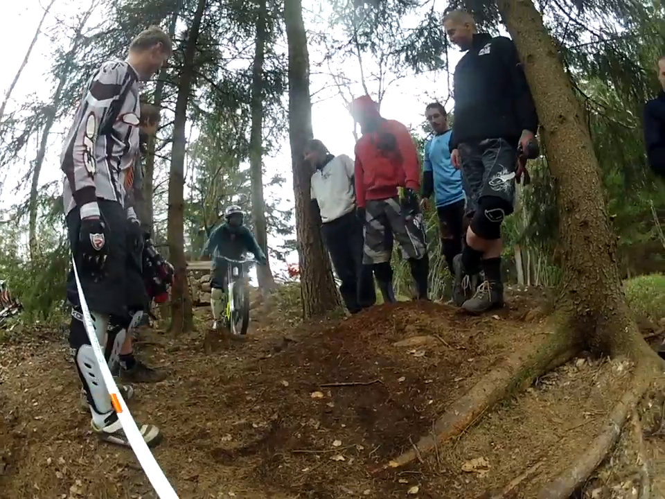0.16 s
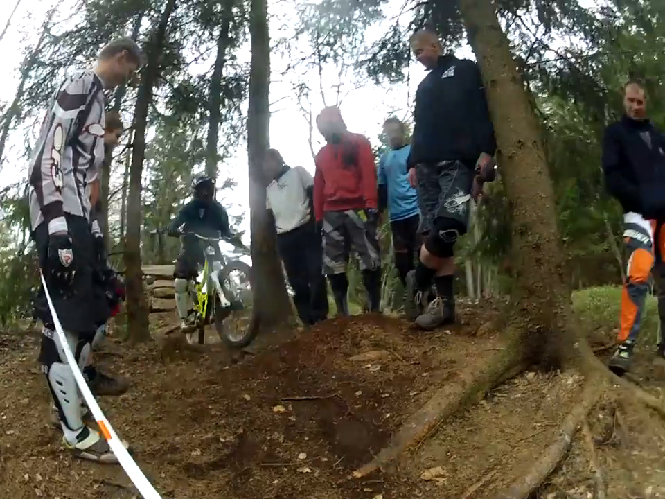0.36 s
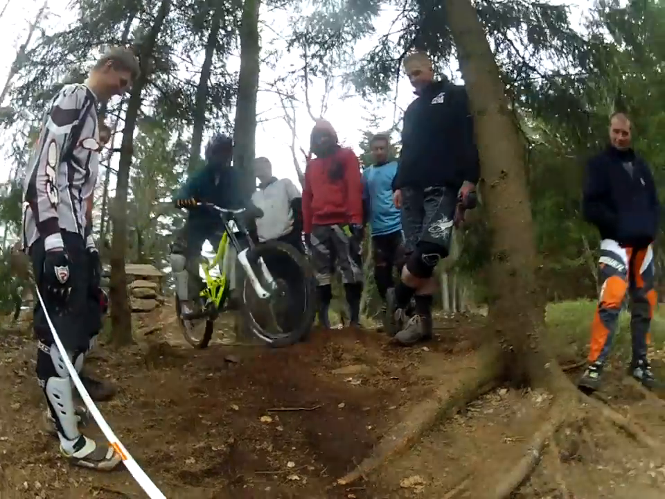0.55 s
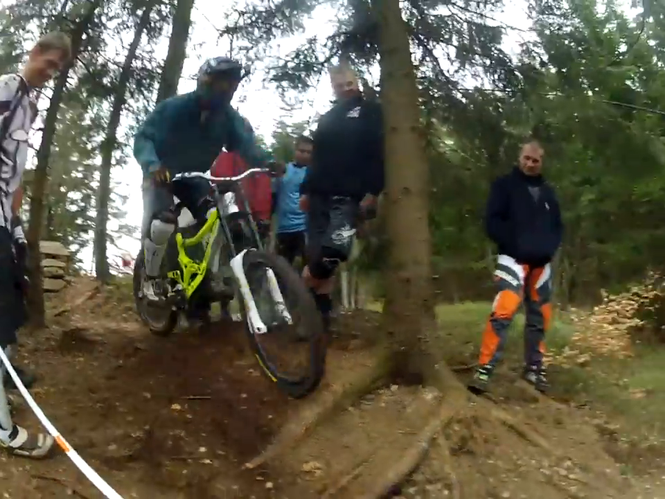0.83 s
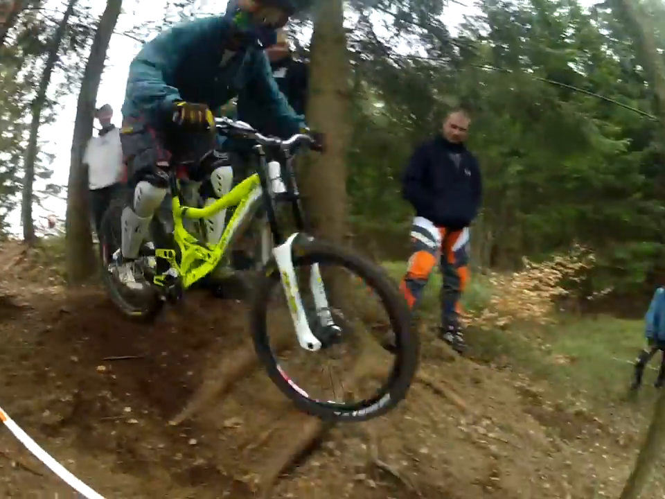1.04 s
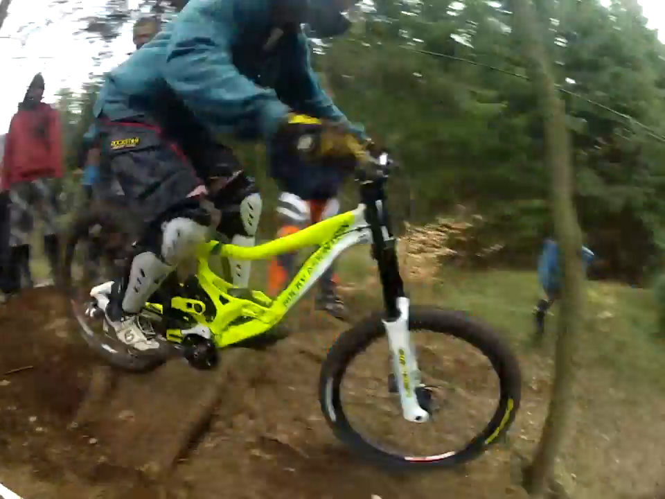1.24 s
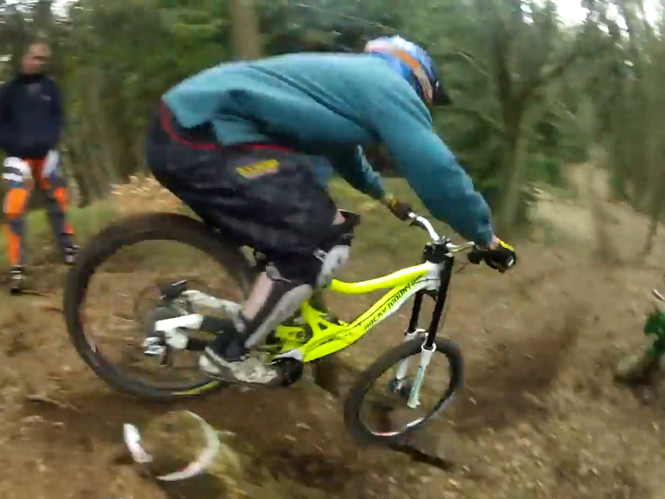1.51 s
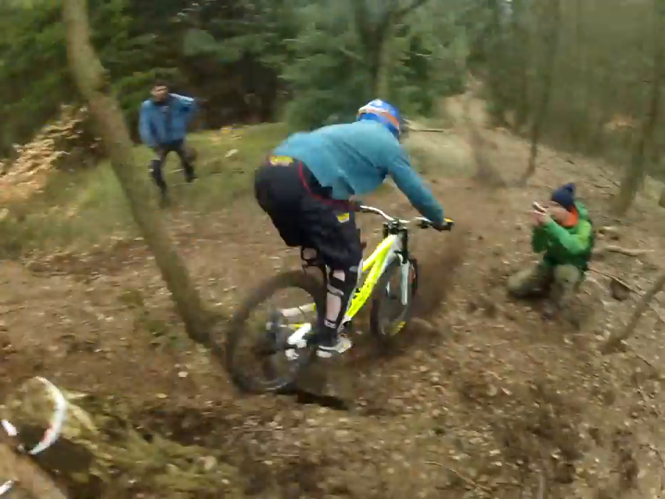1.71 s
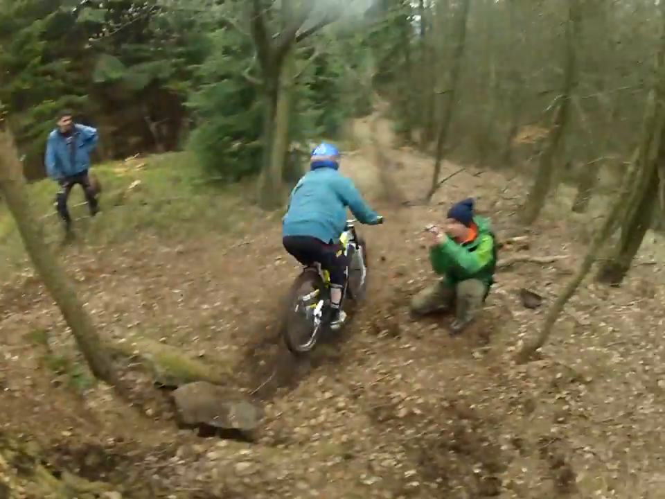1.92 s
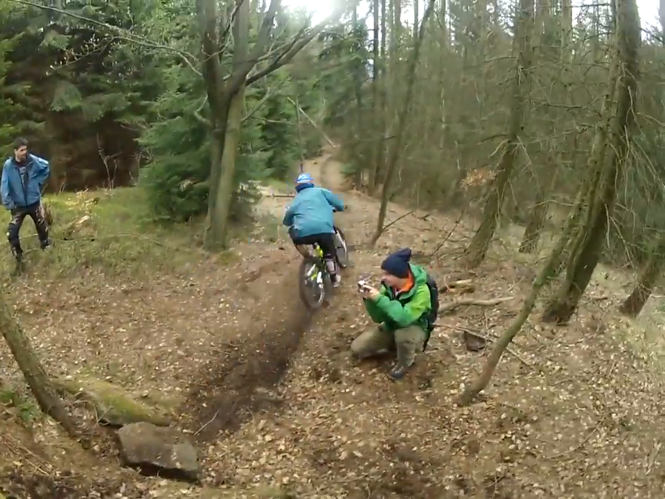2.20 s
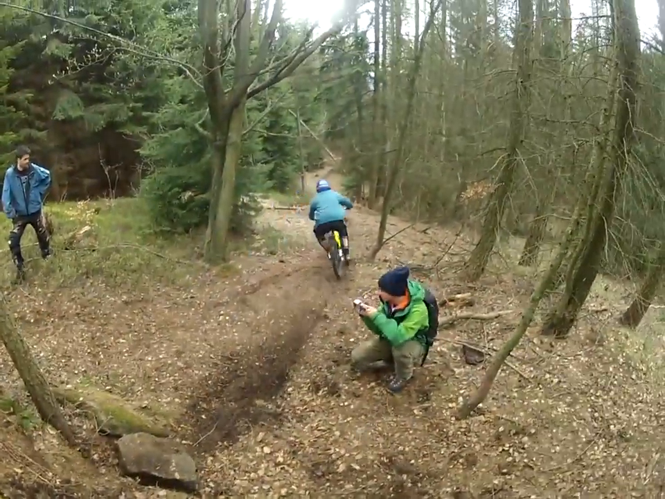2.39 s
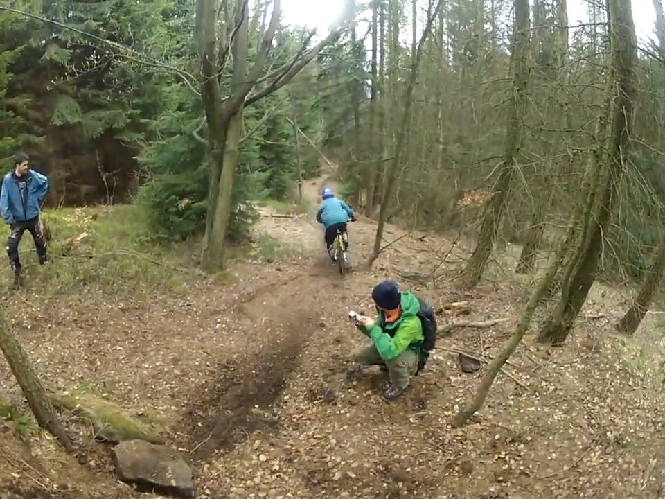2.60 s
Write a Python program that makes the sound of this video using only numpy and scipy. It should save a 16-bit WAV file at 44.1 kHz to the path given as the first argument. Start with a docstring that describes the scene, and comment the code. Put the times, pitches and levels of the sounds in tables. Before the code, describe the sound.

A mountain bike rattles and thumps over roots, then skids through loose dirt in a quiet forest

```python
"""Mountain bike on a forest trail

A mountain bike rolls over roots and skids through loose dirt in a quietly rustling forest.
Random grains and blows excite resonances of the frame and chain; decaying modes make the wheel thumps.
A deep tone of wavering pitch sways under it all, with low resonant noise around it.
A small camera mounted on the bike holds each sample of a slow converter, mirroring the sound into the treble."""
import sys
import numpy as np
from scipy.fft import rfft, irfft, next_fast_len
from scipy.io import wavfile
from scipy.ndimage import uniform_filter1d, map_coordinates

SR = 44100
rng = np.random.default_rng(int(sys.argv[2]) if len(sys.argv) > 2 else 0)


def digitize_waveform(pressure):
    """Quantize a signal to 16-bit integers and store it at the path in sys.argv[1].

    Rows of a 2-D input are taken as channels; values are limited to [-1, 1].
    """
    field = np.atleast_2d(pressure).T
    bounded = np.clip(field, -1, 1)
    quanta = np.round(bounded * 32767).astype(np.int16)
    wavfile.write(sys.argv[1], SR, quanta)


N = 121275
T = np.arange(N) / SR

# Forest and low hum
FOREST_DB = -64
RUMBLE_DB, RUMBLE_HZ, RUMBLE_WIDTH_HZ = -11.5, 37.3, 30  # level relative to the smoothed hum level
BOOM_HZ, BOOM_WIDTH_HZ = 70, 15.6  # each of two cascaded resonances
# Wheel thumps
GLIDE, GLIDE_S = 0.43, 0.011  # the boom starts this share high and settles with this time constant
BOOM_RISE_S, KNOCK_RISE_S = 0.0039, 0.0012
SCUFF_DB, SCUFF_RISE_S, SCUFF_T60 = -6.5, 0.0027, 0.079  # soil noise relative to the knock; t60 in s
# Chain ticks
TICK_T60, TICK_DB, SNAP_DB = 0.03, -3.5, 19.5  # s; offset of every tick; sharp contact over its burst
# Loose dirt
GRAINS_PER_S, HISS_SHARE, GRAIN_SPREAD_DB = 3000, 0.44, 2.5
FOCUS_DB, BED_FOCUS_DB = 7.5, 2  # loss per octave away from the centre: rattles, steady grit
RATTLE_RISE_S, RATTLE_DB = 0.0012, -8  # RATTLE_DB offsets every rattle
STRIKE_DB, STRIKE_FOCUS = 15.5, 2.2  # opening blow over its burst; factor on its loss per octave
# Converter
CONVERTER_HZ = 12000
GUARD_HZ, GUARD_ORDER = 5720, 22  # low-pass ahead of the hold
HISS_DB, HISS_HZ = -74.5, 10500  # level of the white noise before its high-pass, and the cutoff
ROLL_OFF_HZ, TOP_HZ = 15400, 15850


def amp(db):
    """Logarithmic level: dB to a gain in amplitude."""
    return 10 ** (np.asarray(db) / 20)


def unit(x):
    """Normalization to a root-mean-square value of 1."""
    return x / np.sqrt(np.mean(x ** 2) + 1e-20)


def along(points, hz):
    """Spectral envelope: (Hz, value) points joined on a logarithmic frequency axis."""
    f, v = np.transpose(points)
    return np.interp(np.log(hz + 1), np.log(f + 1), v)


def curves(rows):
    """Piecewise-linear modulation: one value per sample for each column after the time."""
    s, *cols = np.transpose(rows)
    return [np.interp(T, s, c) for c in cols]


def wobble(rate):
    """Slow random fluctuation: a smooth curve through random knots, rate of them a second."""
    return map_coordinates(rng.standard_normal(int(N * rate / SR) + 4), [T * rate])


def filtered(x, response):
    """Linear filtering: the spectrum of x times a complex frequency response."""
    m = next_fast_len(N + SR // 2)
    return irfft(rfft(x, m) * response(np.fft.rfftfreq(m, 1 / SR)), m)[..., :N]


def peak(f, hz, width_hz):
    """Damped resonance: a causal second-order band-pass with unit gain at its centre."""
    return 1j * f * width_hz / (hz * hz - f * f + 1j * f * width_hz)


def burst(s, rise, t60, hold=0):
    """Exponential envelope: swells up to time s, holds, then falls 60 dB in t60 seconds."""
    swell = np.exp(np.minimum(T - s, 0) / abs(rise))
    decay = amp(-60 * np.maximum(T - s - abs(hold), 0) / abs(t60))
    return np.where(T < s, swell, decay)


def ring(s, modes, rise, glide=0):
    """Modal decay: modes struck at time s at slightly random levels, sliding down into pitch."""
    t = np.maximum(T - s, 0)
    bent = t + glide * GLIDE_S * (1 - np.exp(-t / GLIDE_S))
    out = 0
    for hz, db, t60 in modes:
        decay = amp(db + rng.normal(0, 1.2) - 60 * t / t60)
        out = out + decay * np.sin(2 * np.pi * hz * bent)
    return (1 - np.exp(-t / rise)) * out


def gravel(share):
    """Shot noise: sparse random grains of scattered size on a share of plain hiss."""
    hits = rng.random(N) < GRAINS_PER_S / SR
    grains = hits * rng.standard_normal(N) * amp(GRAIN_SPREAD_DB * rng.standard_normal(N))
    return unit(unit(grains) + share * rng.standard_normal(N))


def forest():
    """Coloured noise: the trees' quiet rustle is spectrally shaped noise of slowly wavering level."""
    # Each row: frequency in Hz, relative spectral level in dB per Hz.
    rustle_colour = [(350, -21), (600, -4), (648, -7), (1180, -16.5), (1470, -11.5), (2160, -14.5),
                     (2750, -14), (5900, -20), (7670, -43), (13000, -120)]
    rustle = unit(filtered(rng.standard_normal(N), lambda f: amp(along(rustle_colour, f))))
    return amp(FOREST_DB + 1.7 * wobble(7.44)) * rustle


def hum():
    """Frequency modulation and resonance: a wavering tone in loose rumble, with noise an octave above."""
    # Path of the deep tone. Each row: time in seconds, mean pitch in Hz, mean rms level in dB.
    tone_path = [(0.0, 34.7, -52), (0.05, 35.6, -46), (0.21, 33.6, -43.5), (0.25, 33.96, -32.5),
                 (0.57, 34.67, -30.5), (0.65, 33.8, -44), (0.67, 34.8, -31), (0.72, 35.8, -44),
                 (0.77, 36.3, -48), (0.82, 36.2, -34.5), (0.9, 35.57, -36), (0.92, 35.67, -19.5),
                 (0.94, 35.5, -20.5), (1.0, 34.9, -26.5), (1.18, 35.04, -37), (1.25, 34.7, -29),
                 (1.29, 36.8, -34), (1.31, 38.2, -49), (1.33, 37.7, -35.5), (1.35, 37, -31.5),
                 (1.42, 37.1, -36), (1.44, 38.4, -57), (1.46, 38.3, -37), (1.55, 37.9, -38.5),
                 (1.59, 37.1, -33), (1.71, 31.1, -39), (1.75, 29.2, -45.5), (1.81, 29.7, -29.5),
                 (1.83, 31.33, -32.5), (1.89, 29.57, -45), (1.96, 31.42, -32), (2.1, 31.8, -38.5),
                 (2.17, 31.9, -34), (2.23, 33.45, -44.5), (2.35, 32.93, -38), (2.48, 33.3, -37),
                 (2.53, 32.4, -51.5), (2.57, 32.3, -39.5), (2.62, 29.9, -50), (2.66, 29, -44),
                 (2.7, 28.2, -48.5), (2.75, 27.1, -45)]
    # Resonant noise an octave above. Each row: time in seconds, level in dB.
    boom_path = [(0.0, -64), (0.16, -50.5), (0.5, -45.5), (0.6, -56), (0.72, -45), (0.84, -45),
                 (0.93, -42.5), (1.58, -57), (1.88, -59), (1.98, -51), (2.37, -62), (2.75, -62)]
    hz, db = curves(tone_path)
    level = np.sqrt(2) * amp(db + 0.64 * wobble(14.33))
    phase = 2 * np.pi * np.cumsum(hz + 1.32 * wobble(16)) / SR
    tone = level * np.sin(phase)
    boom = unit(filtered(rng.standard_normal(N), lambda f: peak(f, BOOM_HZ, BOOM_WIDTH_HZ) ** 2))
    rumble = unit(filtered(rng.standard_normal(N), lambda f: peak(f, RUMBLE_HZ, RUMBLE_WIDTH_HZ) ** 2))
    rumble_level = amp(uniform_filter1d(db, size=SR // 30) + RUMBLE_DB)
    return tone + rumble_level * rumble + amp(curves(boom_path)[0]) * boom


def tyres():
    """Impact excitation: roots strike decaying wheel modes and scuff soil over dull rolling noise."""
    # Tyres rolling on soil. Each row: time in seconds, mean level in dB.
    roll_path = [(0, -56), (.2, -54), (.4, -52.5), (.6, -56), (.9, -56.5), (1.05, -53.5), (1.3, -55),
                 (1.45, -53.5), (1.65, -54.5), (1.85, -52.5), (2.0, -49.5), (2.1, -55), (2.3, -55.5),
                 (2.75, -57.5)]
    # Colour of the soil noise. Each row: frequency in Hz, relative spectral level in dB per Hz.
    soil_colour = [(53, -3), (90, -12), (150, -4.5), (190, -7), (320, -8.5), (420, -11.5), (600, -22),
                   (900, -25.5), (1170, -33), (1980, -120)]
    # Wheels hitting roots. Each row: start in seconds, boom level in dB, settled boom pitch in Hz,
    # knock level in dB, delay of the boom in seconds, boom t60 in seconds.
    thumps = [(.36, -40, 78.7, -45, .004, 0.18), (0.64, -23, 68.6, -40, 0.0037, 0.38),
              (0.852, -53, 70, -44.5, .004, .2), (.906, -24.5, 60.8, -45, 0.0018, .15),
              (1.156, -46, 70, -39, 0.0034, .2), (1.24, -50, 70, -55, .004, .2),
              (1.385, -33, 62.3, -54, 0.0047, .25), (1.461, -57, 70, -45, .004, .2),
              (1.546, -43, 70, -38, 0.0032, 0.22), (1.564, -22.5, 66.6, -27, .011, 0.47),
              (1.796, -33, 68.6, -46, 0.003, 0.19), (1.874, -39, 70, -38, .004, 0.17),
              (1.975, -39, 70, -35.5, .004, .2)]
    # Modes of the knock. Each row: frequency in Hz, mean level in dB over the knock level, t60 in seconds.
    knock_modes = [(188, -0.5, 0.048), (274.4, -10.5, 0.16), (357, 0.5, 0.058), (509, -15, 0.039),
                   (1000, -14, 0.03)]
    roll = unit(filtered(rng.standard_normal(N), lambda f: amp(along(soil_colour, f))))
    level = amp(curves(roll_path)[0] + 1.6 * wobble(24.82))
    out = 0
    for s, boom_db, hz, knock_db, lag, t60 in thumps:
        out = out + amp(boom_db) * ring(s + lag, [(hz, 0, t60)], BOOM_RISE_S, GLIDE)
        out = out + amp(knock_db) * ring(s, knock_modes, KNOCK_RISE_S)
        level = level + amp(knock_db + SCUFF_DB) * burst(s + 0.001, SCUFF_RISE_S, SCUFF_T60)
    return out + level * roll


def chain():
    """Resonant contact: a sharp contact in a short burst of noise rings the links at each tick."""
    # Chain ticks. Each row: time in seconds, level in dB before TICK_DB, rise constant in seconds.
    ticks = [(0.196, -56, 0.002), (0.372, -45, 0.0033), (0.4207, -49.5, 0.0022), (0.6769, -36.5, 0.0048),
             (0.779, -42, 0.0028), (0.9226, -29.5, 0.00075), (1.0165, -35.5, 0.006), (1.0435, -54, 0.002),
             (1.0964, -39, 0.0015), (1.1592, -42.5, 0.0011), (1.3503, -49, 0.002), (1.3982, -43, 0.0017),
             (1.5235, -39, 0.0016), (1.5753, -41, 0.0058), (1.6224, -41, 0.003), (1.739, -44.5, 0.0015),
             (2.718, -50.5, 0.002)]
    # Resonances of the links. Each row: centre in Hz, width in Hz, relative gain in dB.
    link_modes = [(4800, 500, -0.5), (2760, 330, -10), (3670, 650, -7.5), (1960, 420, -12.5)]

    def links(f):
        """Parallel resonances over a weak direct path."""
        return sum(amp(db) * peak(f, hz, width) for hz, width, db in link_modes) + 0.13

    noise, drive = rng.standard_normal(N), np.zeros(N)
    for s, db, rise in ticks:
        drive += amp(db + TICK_DB) * burst(s + 0.002, rise, TICK_T60) * noise
        drive[round((s + 0.0015) * SR)] += amp(db + TICK_DB + SNAP_DB)
    return filtered(drive, links) / np.std(filtered(noise, links))


def dirt():
    """Source and filter: grit, steady and in bursts that open with a blow, excites frame resonances."""
    # Steady loose dirt. Each row: time in seconds, level in dB before band focus, centre in Hz.
    grit_path = [(0.0, -60, 2330), (0.21, -58.5, 1980), (0.24, -60, 1560), (0.39, -47.5, 1790),
                 (0.48, -55.5, 1610), (0.79, -58, 2600), (0.83, -57.5, 1598), (0.93, -56, 2550),
                 (0.97, -54, 1870), (1.01, -58, 2580), (1.11, -52, 1916), (1.54, -53.5, 2165),
                 (1.56, -57, 1600), (1.61, -51, 2255), (1.95, -44.5, 2350), (2.01, -48.5, 1890),
                 (2.14, -48, 2290), (2.3, -61.5, 1963), (2.6, -61, 1863), (2.75, -60.5, 2620)]
    # Colour of the grit. Each row: frequency in Hz, relative spectral level in dB per Hz.
    grit_colour = [(300, -32), (500, -20), (860, -12), (1050, 0), (1290, -6.5), (1660, 1), (2300, -6),
                   (2500, -9), (2780, -3), (3900, -8), (4100, -10.5), (5900, -11.5)]
    # Resonances of the frame. Each row: centre in Hz, width in Hz, height in dB over the colour.
    frame_modes = [(990, 30, 1.5), (1610, 67, 1.5), (2283, 84, 7), (2780, 60, 8), (3665, 100, 9)]
    # Rattling bursts. Each row: start in seconds, level in dB before RATTLE_DB and band focus,
    # t60 in seconds, centre in Hz, hold in seconds.
    rattles = [(0.241, -39, 0.11, 1590, 0.0073), (0.284, -37, 0.094, 1540, 0.008),
               (0.307, -42, 0.12, 1520, 0.01), (0.3294, -46, 0.09, 1400, 0.008),
               (0.371, -35, 0.15, 1470, 0.0071), (0.4025, -39, 0.2, 1700, 0.0094),
               (0.468, -36.5, 0.13, 1510, 0.008), (0.5, -45, 0.09, 1610, 0.013),
               (0.6484, -41, 0.069, 1720, 0.0071), (0.728, -46.5, 0.099, 2780, 0.008),
               (0.846, -39, 0.077, 1500, 0.0061), (0.91, -39.5, 0.17, 1850, 0.0099),
               (1.101, -36, 0.19, 1730, 0.016), (1.133, -34, 0.11, 1520, 0.01),
               (1.1565, -31, 0.1, 2200, 0.0092), (1.246, -41, 0.056, 1755, 0.008),
               (1.348, -37, 0.09, 2230, 0.0086), (1.397, -43, 0.073, 2800, 0.008),
               (1.4113, -30.5, 0.069, 2150, 0.008), (1.443, -33.5, 0.082, 1480, 0.0095),
               (1.4705, -38, 0.16, 2230, 0.0094), (1.518, -34, 0.16, 1640, 0.01),
               (1.5702, -27.5, 0.049, 2780, 0.006), (1.62, -32, 0.11, 2740, 0.011),
               (1.6392, -32.5, 0.073, 1910, 0.0077), (1.694, -36.5, 0.15, 2700, 0.0096),
               (1.726, -32, 0.09, 1640, 0.01), (1.777, -40, 0.06, 1040, 0.0061),
               (1.8136, -29.5, 0.066, 2760, 0.0043), (1.8376, -35.5, 0.15, 2700, 0.0059),
               (1.8765, -24.5, 0.11, 1680, 0.0065), (1.919, -28, 0.084, 2820, 0.0077),
               (1.939, -32, 0.063, 2800, 0.0066), (1.9765, -25, 0.088, 2780, 0.0075),
               (1.9894, -24, 0.093, 1790, 0.009), (2.0086, -33.5, 0.079, 1610, 0.011),
               (2.027, -26.5, 0.088, 2250, 0.0072), (2.046, -40.5, 0.089, 1678, 0.0063),
               (2.11, -35.5, 0.075, 1550, 0.0072), (2.122, -28, 0.094, 3720, 0.0089),
               (2.1484, -45, 0.09, 1640, 0.008), (2.4915, -31.5, 0.1, 1900, 0.007),
               (2.543, -44.5, 0.09, 1638, 0.008), (2.719, -43.5, 0.09, 2805, 0.0074)]
    # Centres in Hz of the overlapping bands.
    bands_hz = [600, 1070, 1610, 2270, 2800, 3600, 4900]

    def frame(f):
        """Resonant peaks standing on the broad colour of the grit."""
        peaks = sum((amp(db) - 1) * peak(f, c, w) for c, w, db in frame_modes)
        return amp(along(grit_colour, f)) * (1 + peaks)

    level_db, centre = curves(grit_path)
    bed = amp(level_db + 2.4 * wobble(18) + 1.4 * wobble(60))
    bursts = np.array([amp(db + RATTLE_DB) * burst(s, RATTLE_RISE_S, t60, hold)
                       for s, db, t60, _, hold in rattles])
    start_s, rattle_db, _, rattle_hz, _ = np.transpose(rattles)
    starts = np.round(start_s * SR).astype(int)
    blows = amp(rattle_db + RATTLE_DB + STRIKE_DB)
    steady, shaken = gravel(share=0.8), gravel(HISS_SHARE)
    out = 0
    for band in bands_hz:
        # each burst favours the bands near its own centre
        near = amp(-FOCUS_DB * np.abs(np.log2(rattle_hz / band)))
        bed_focus_db = -BED_FOCUS_DB * np.abs(np.log2(centre / band))
        drive = bed * amp(2.7 * wobble(22.11) + bed_focus_db) * steady
        drive = drive + (near @ bursts) * amp(2.1 * wobble(90)) * shaken
        drive[starts] += blows * near ** STRIKE_FOCUS
        # 1 at this band's centre, falling to 0 at its neighbours
        part = [(hz, hz == band) for hz in bands_hz]
        out = out + filtered(drive, lambda f: frame(f) * along(part, f))
    return out / np.std(filtered(steady, frame))


def scene():
    """Superposition: the pressures of all sources add at one microphone."""
    return (forest() + hum() + tyres() + chain() + dirt())[None]


def record(dry):
    """Sample and hold: spectral images around the converter rate under a sinc, with faint treble hiss."""
    x = filtered(dry, lambda f: 1 / np.sqrt(1 + (f / GUARD_HZ) ** (2 * GUARD_ORDER)))
    # the carrier adds the mirror images, the sinc is the response of the hold
    imaged = x * (1 + 2 * np.cos(2 * np.pi * CONVERTER_HZ * T))
    held = filtered(imaged, lambda f: np.sinc(f / CONVERTER_HZ))
    hiss = amp(HISS_DB) * filtered(rng.standard_normal(dry.shape), lambda f: f > HISS_HZ)
    # 0.035 dB per Hz above the roll-off, then nothing above the top
    return filtered(held + hiss, lambda f: amp(-0.035 * np.maximum(f - ROLL_OFF_HZ, 0)) * (f < TOP_HZ))


dry = scene()
out = record(dry)
digitize_waveform(out)
```